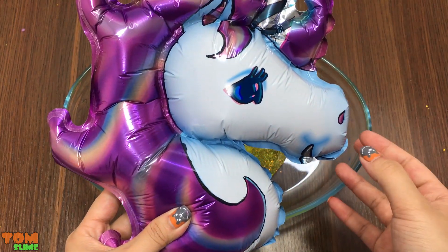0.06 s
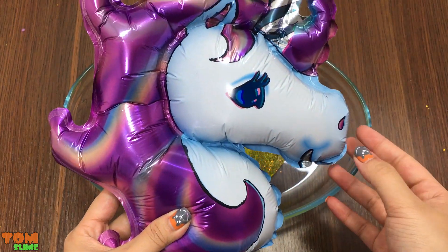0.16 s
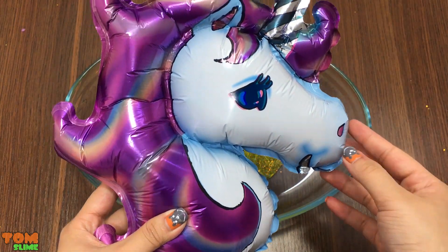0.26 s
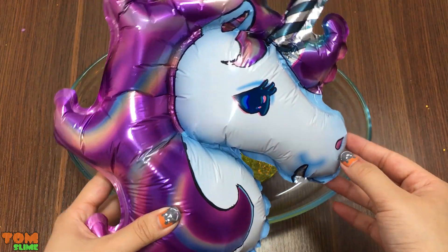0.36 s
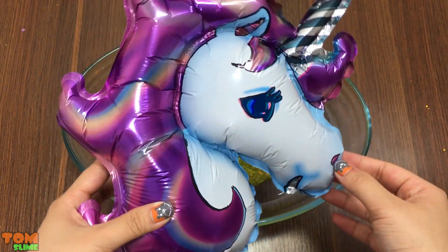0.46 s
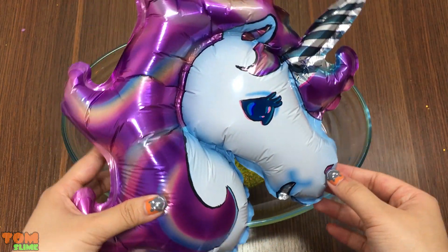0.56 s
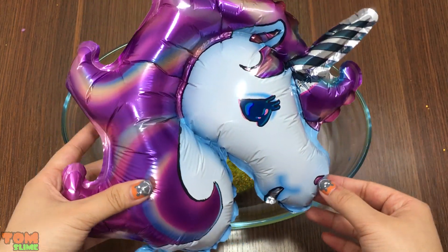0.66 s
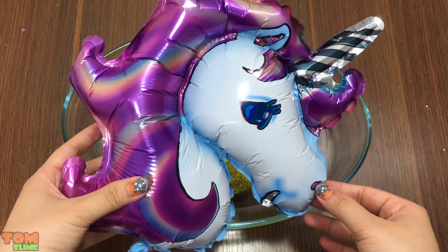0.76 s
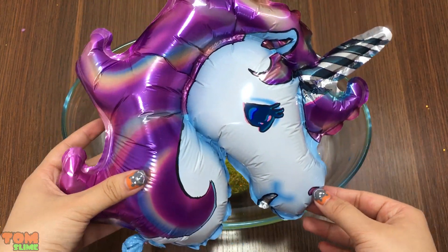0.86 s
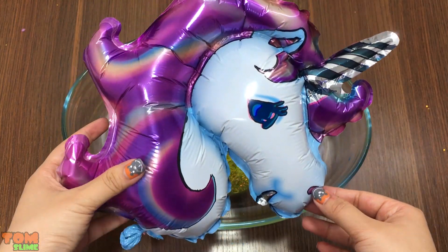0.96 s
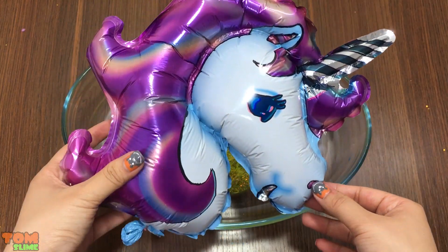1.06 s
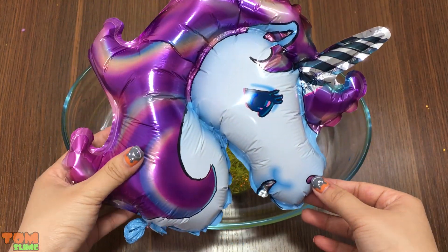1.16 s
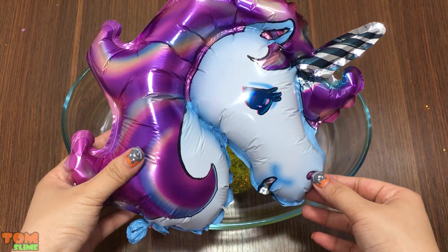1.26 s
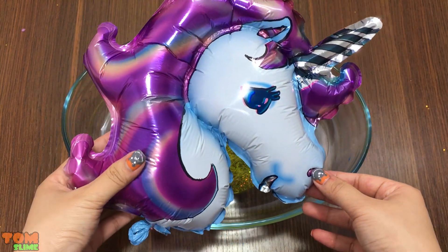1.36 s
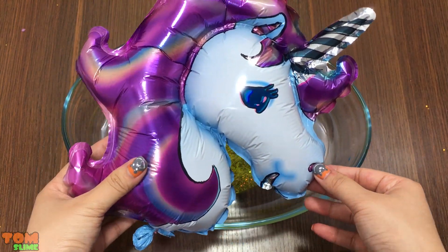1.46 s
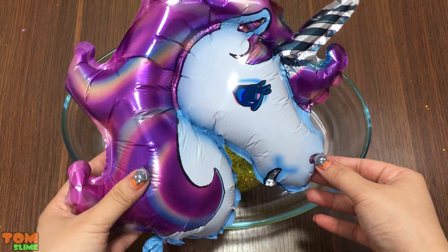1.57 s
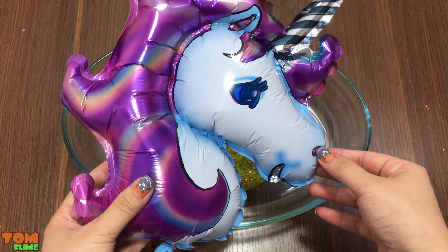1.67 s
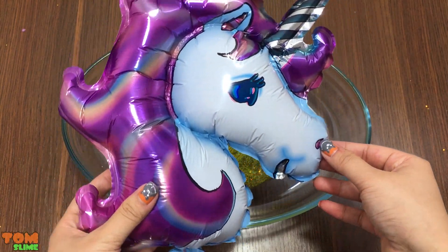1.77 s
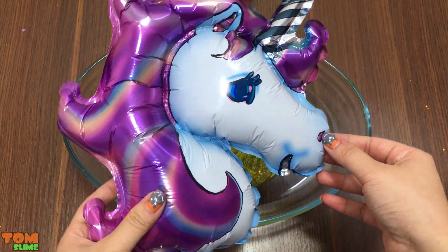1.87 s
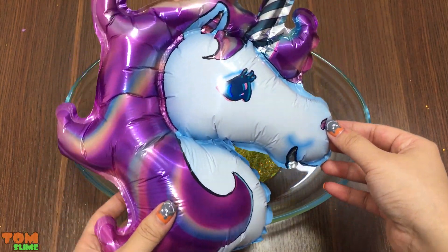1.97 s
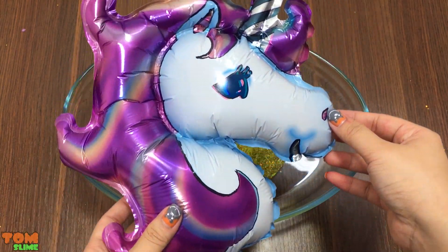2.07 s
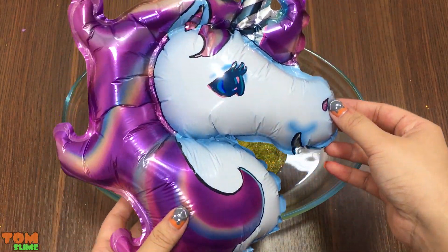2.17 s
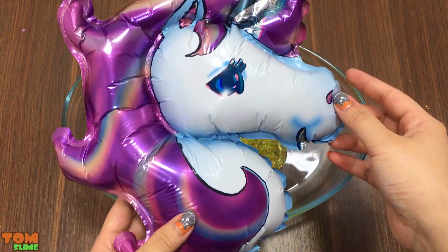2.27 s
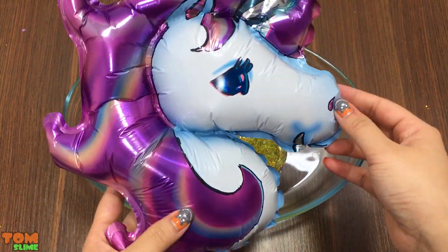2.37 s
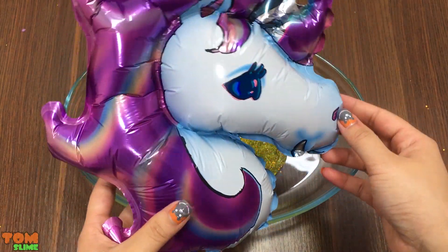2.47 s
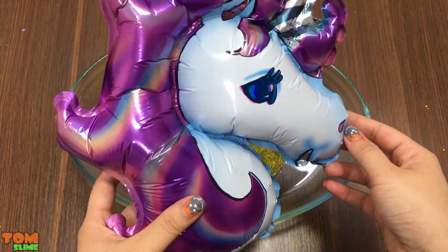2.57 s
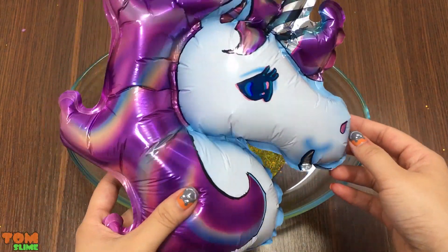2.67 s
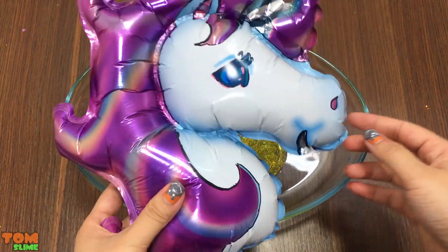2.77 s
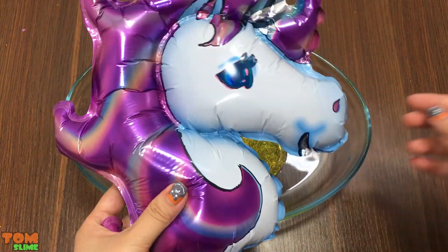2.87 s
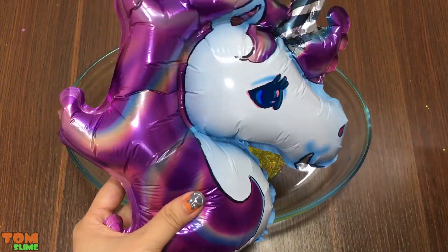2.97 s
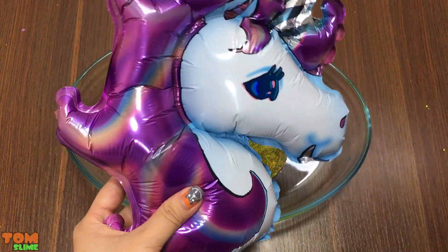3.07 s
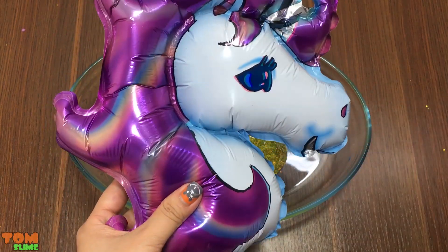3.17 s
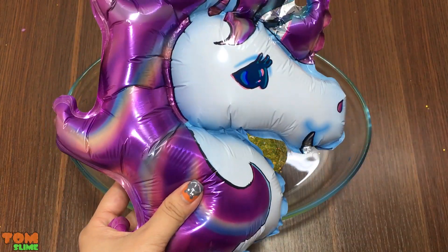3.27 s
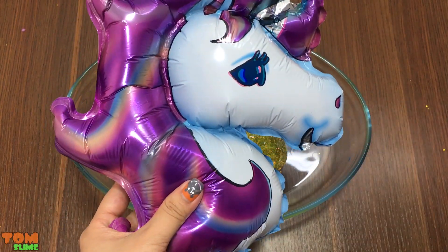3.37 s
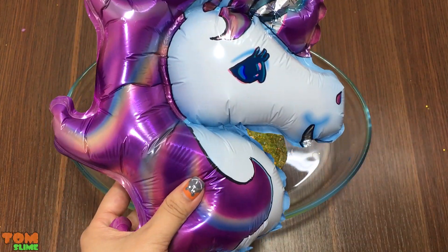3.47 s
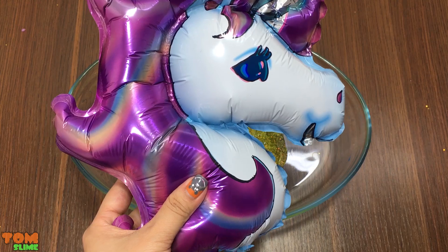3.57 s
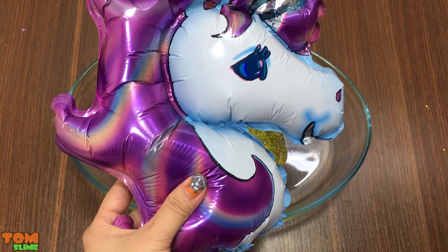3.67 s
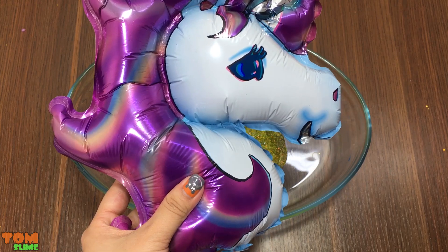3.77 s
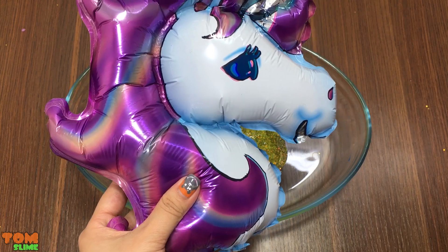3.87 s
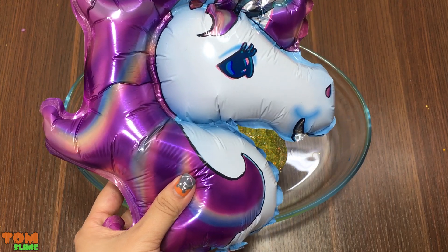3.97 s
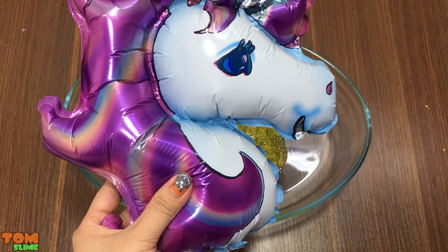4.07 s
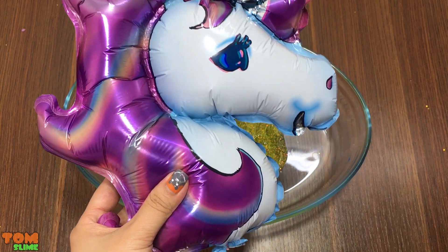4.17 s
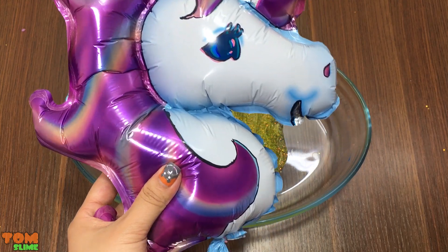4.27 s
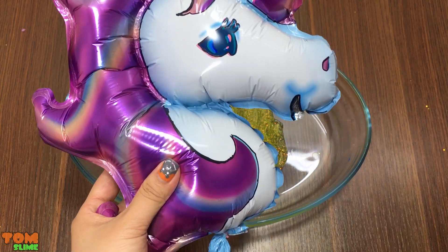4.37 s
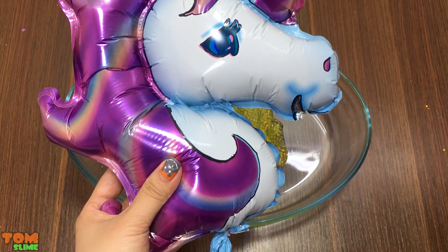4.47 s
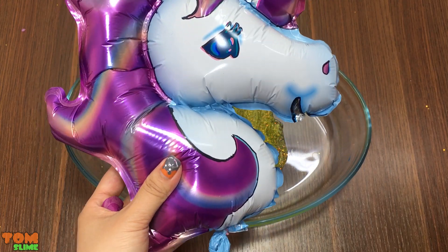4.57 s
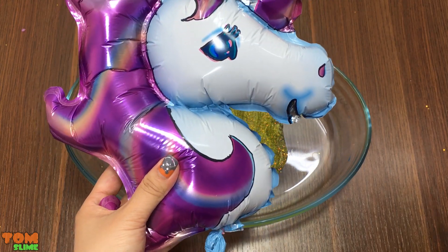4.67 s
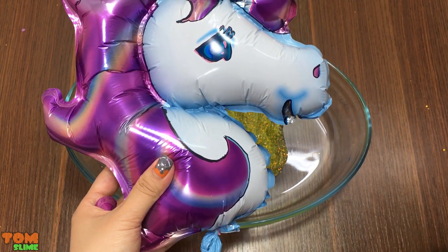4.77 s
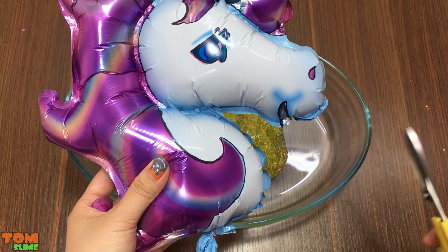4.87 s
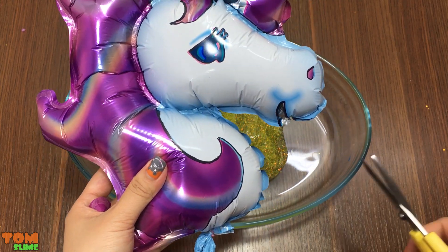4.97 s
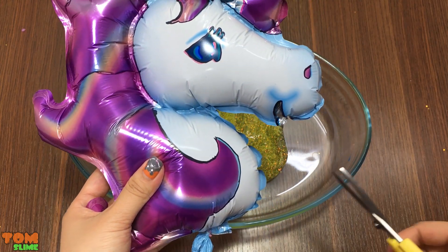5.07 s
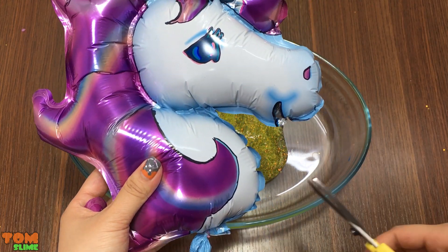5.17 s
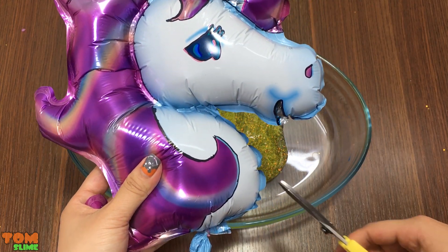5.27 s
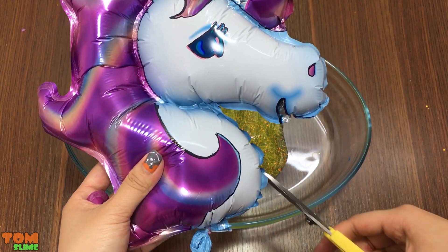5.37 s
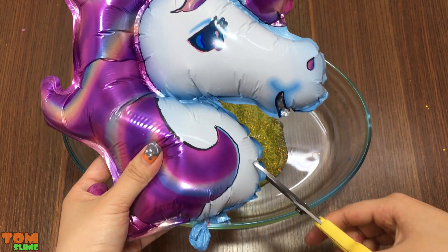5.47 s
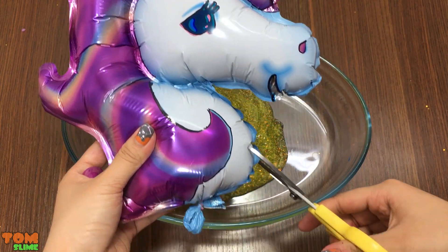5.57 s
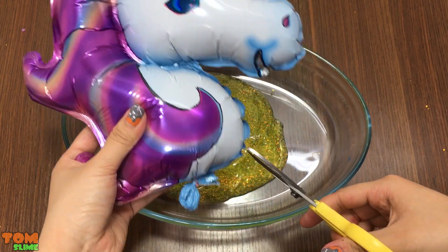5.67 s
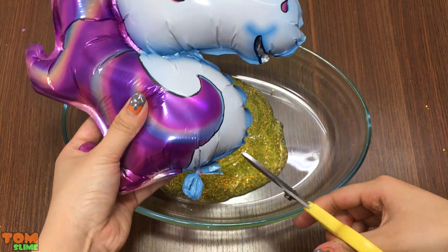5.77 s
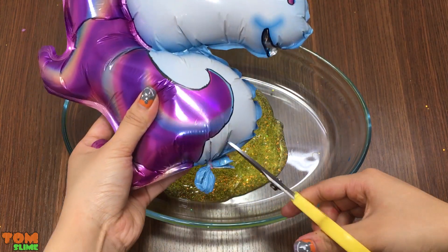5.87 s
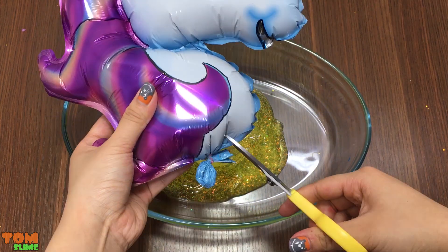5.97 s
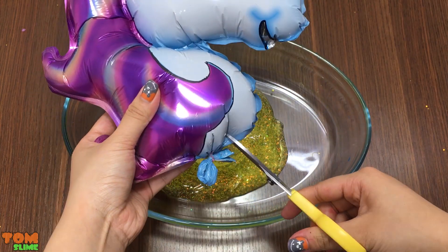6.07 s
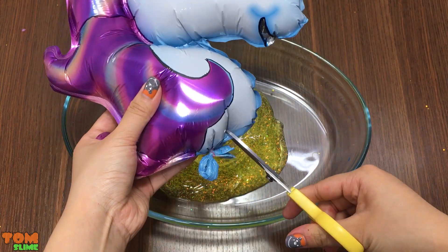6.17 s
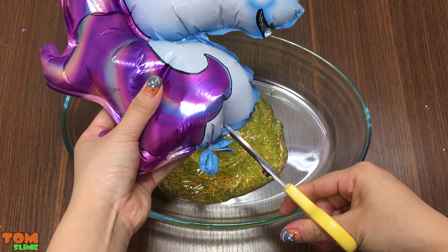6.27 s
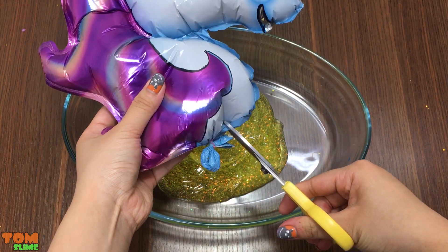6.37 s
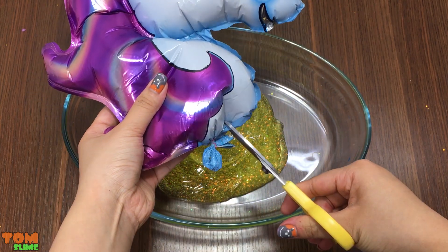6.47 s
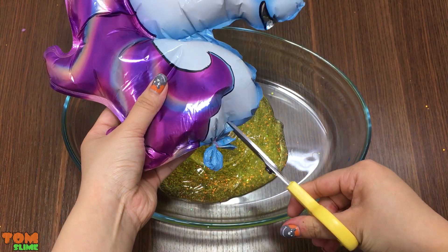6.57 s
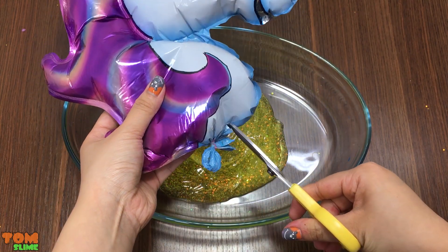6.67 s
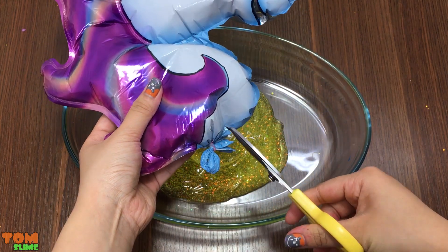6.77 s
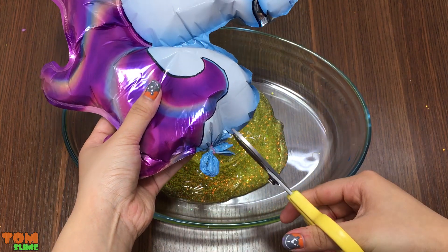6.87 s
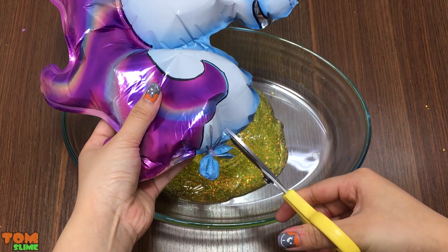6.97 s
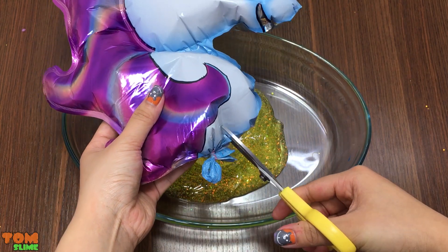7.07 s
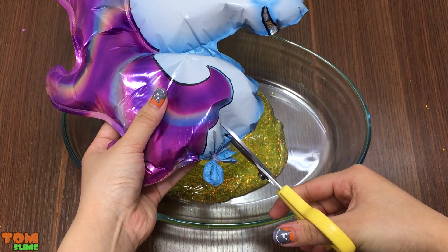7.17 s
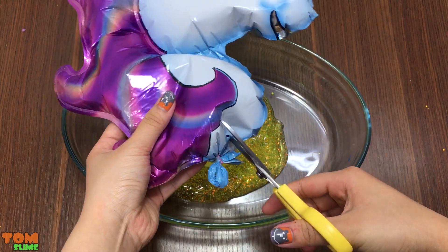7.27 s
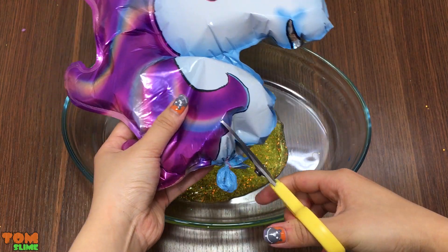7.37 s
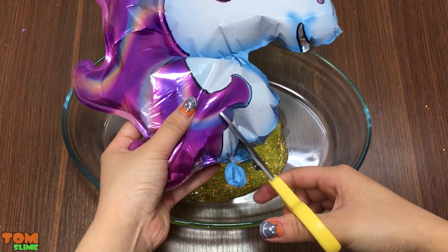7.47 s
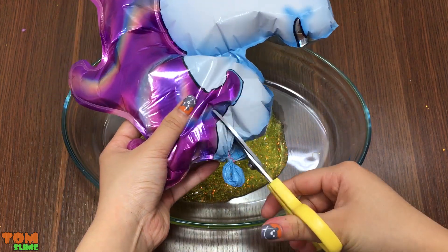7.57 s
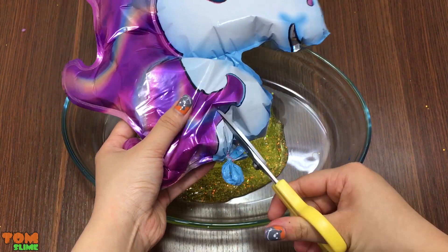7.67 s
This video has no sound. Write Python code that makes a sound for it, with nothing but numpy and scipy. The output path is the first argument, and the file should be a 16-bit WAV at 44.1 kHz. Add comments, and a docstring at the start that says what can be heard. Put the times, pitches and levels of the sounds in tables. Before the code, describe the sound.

Close to the microphone, fingers rub and bump a taut foil balloon, with sharp little creases snapping irregularly. A glass bowl pings faintly, scissors click lightly in a quieter spell, then the foil breaks with two very loud cracks close together and a third soon after. Dense crackling follows and swells to the end, in a hard room with a low appliance hum.

```python
"""Foil balloon burst with scissors

An inflated foil balloon is turned over a glass bowl, close to the microphone: creases snap, fingers bump and rub.
The bowl pings faintly, scissors click, and the foil gives way with three loud cracks, then crackles ever harder.
Snaps, knocks and rubbing are shaped noise with short facet rings; glass, steel and hum are sums of sines.
A hard room and the table top answer, over a faint appliance hum."""
import sys
import numpy as np
from scipy import signal
from scipy.fft import rfft, irfft, next_fast_len
from scipy.io import wavfile
from scipy.ndimage import map_coordinates

SR = 44100
rng = np.random.default_rng(int(sys.argv[2]) if len(sys.argv) > 2 else 0)


def master(y):
    """Save y as 16-bit WAV."""
    cut = np.clip(np.atleast_2d(y).T, -1, 1)
    pcm = np.round(cut * 32767)  # scale
    wavfile.write(sys.argv[1], SR, pcm.astype(np.int16))


N = 340893  # length in samples


def amp(db):
    """Turn decibels into gain."""
    return 10 ** (np.asarray(db) / 20)


def unit(x):
    """Scale to rms 1."""
    return x / np.sqrt(np.mean(x ** 2) + 1e-20)


def burst_of(x, seconds):
    """Scale a short sound to the energy of rms 1 held for that long."""
    return x * np.sqrt(seconds * SR / (np.sum(x ** 2) + 1e-20))


def along(points, hz):
    """Read a (Hz, value) curve on a logarithmic frequency axis."""
    f, v = np.transpose(points)
    return np.interp(np.log(hz + 1), np.log(f + 1), v)


def curves(rows):
    """Give one value per sample for each column after the time."""
    s, *columns = np.transpose(rows)
    return [np.interp(np.arange(N) / SR, s, column) for column in columns]


def wobble(rate):
    """Draw a smooth random curve with `rate` knots a second."""
    knots = rng.standard_normal(int(N * rate / SR) + 4)
    return map_coordinates(knots, [np.arange(N) * rate / SR])


def fade(t, t60):
    """Decay exponentially, 60 dB down after t60 seconds."""
    return np.exp(-np.log(1000) * t / t60)


def add(track, s, x):
    """Mix x into the track at time s."""
    start = max(round(s * SR), 0)
    track[start:start + len(x)] += x[:max(N - start, 0)]


def band(x, lo_hz, hi_hz):
    """Keep one band, without smearing it backwards in time."""
    return signal.lfilter(*signal.butter(2, [lo_hz, min(hi_hz, SR / 2 - 100)], "band", fs=SR), x)


def filtered(x, response):
    """Multiply the spectrum of x by a response given as a function of frequency."""
    size = next_fast_len(N + SR // 2)
    return irfft(rfft(x, size) * response(np.fft.rfftfreq(size, 1 / SR)), size)[:N]


def coloured(x, spectrum):
    """Colour x with a minimum-phase filter, so that ticks keep their sharp fronts."""
    size = 8192
    cepstrum = irfft(np.log(amp(along(spectrum, np.fft.rfftfreq(size, 1 / SR)))))
    # folding the cepstrum forward in time makes the filter minimum-phase
    cepstrum[1:size // 2] *= 2
    cepstrum[size // 2 + 1:] = 0
    return signal.fftconvolve(x, irfft(np.exp(rfft(cepstrum))))[:N]


# The appliance's steady tones. Each row: pitch in Hz, peak level in dB around which it wavers.
HUM = [(91.5, -61.5), (166.9, -69), (333.8, -63.5)]
# Colour of the air noise. Each row: frequency in Hz, relative level in dB per Hz.
AIR_COLOUR = [(20, -51), (30, -25), (39, -15), (50, 3), (63, 5.5), (78, -12.5), (110, -6.5), (170, -9.5),
              (340, -14.5), (520, -22.5), (1200, -29.5), (3000, -35.5), (7000, -37), (16000, -46.5)]
AIR_DB = -57.5  # rms


def background():
    """An appliance hums in wavering sine tones over the rumbling, noisy air of the room."""
    t = np.arange(N) / SR
    hum = 0
    for hz, db in HUM:
        level = amp(db + 0.73 * wobble(3.74))
        hum = hum + level * np.sin(2 * np.pi * hz * t + 0.26 * wobble(3.56))
    noise = filtered(rng.standard_normal(N), lambda hz: amp(along(AIR_COLOUR, hz)))
    return hum + amp(AIR_DB) * unit(noise)


# Fingers and blades dragging over the foil.
# Each row: start in seconds, length in seconds, rub level in dB, crinkle level in dB.
STROKES = [(0.305, .1, -63.5, -61.5), (0.415, 0.2, -58.5, -60), (0.617, 0.11, -62.5, -70),
           (0.694, .05, -62, -54), (0.934, 0.16, -61.5, -59), (1.167, 0.24, -69.5, -76),
           (1.536, 0.39, -64, -67.5), (1.806, 0.3, -61, -72), (2.242, 0.048, -62.5, -68.5),
           (2.32, 0.081, -59.5, -57.5), (2.416, .04, -61, -60.5), (2.475, 0.22, -62, -62),
           (2.684, 0.3, -59.5, -57), (2.902, 0.038, -67, -50), (3.119, 0.052, -76, -60.5),
           (3.419, .06, -53.5, -64), (3.75, 0.134, -62.5, -76), (3.919, 0.084, -59.5, -69),
           (4.567, 0.02, -73, -62.5), (5.638, 0.16, -62, -68), (6.015, .025, -54, -51),
           (6.11, 0.23, -59, -65), (6.625, 0.097, -57, -74), (6.935, 0.052, -44.5, -53),
           (7.099, 0.16, -52.5, -52.5)]
STROKE_ATTACK_S, STROKE_RELEASE_T60 = 0.0084, 0.043  # both in seconds
# The steady grip of the hand. One row: rub level in dB, crinkle level in dB.
GRIP_DB = (-81, -74.5)
# Crackling that starts at once and dies away after a crack; the first row is a sound already fading as the
# scene opens. # Each row: start in seconds, rub level in dB, crinkle level in dB, t60 in seconds.
DYING_CRACKLES = [(0.0, -41, -32.5, 0.58), (5.76, -55.5, -47.5, 0.36), (6.041, -41.5, -34.5, 0.42),
                  (6.276, -32.5, -24.5, 0.69), (6.735, -44, -49, 0.69)]
CRACKLE_ATTACK_S = 0.0027
# The emptying balloon crumples ever harder under the blades.
CRUMPLE_START_S, CRUMPLE_DB_PER_S = 7.3, 21.5
CRUMPLE_RUB_DB, CRUMPLE_CRINKLE_DB = -51.5, -50.5  # levels at the start


def effort():
    """Give the gains of rub and crinkle: grip, strokes, dying crackles and crumpling add in power."""
    t = np.arange(N) / SR

    def rise(s, attack):
        return np.clip((t - s) / attack, 0, 1)

    def fall(s, t60):
        return fade(np.maximum(t - s, 0), t60)

    moves = [(np.ones(N), *GRIP_DB)]
    for s, length, rub_db, crinkle_db in STROKES:
        shape = rise(s, STROKE_ATTACK_S) * fall(s + length, STROKE_RELEASE_T60)
        moves.append((shape, rub_db, crinkle_db))
    for s, rub_db, crinkle_db, t60 in DYING_CRACKLES:
        moves.append((rise(s, CRACKLE_ATTACK_S) * fall(s, t60), rub_db, crinkle_db))
    growth = amp(CRUMPLE_DB_PER_S * (t - CRUMPLE_START_S))
    crumple = rise(CRUMPLE_START_S, STROKE_ATTACK_S) * growth
    moves.append((crumple, CRUMPLE_RUB_DB, CRUMPLE_CRINKLE_DB))
    return np.sqrt(sum(np.outer(amp(levels_db), shape) ** 2 for shape, *levels_db in moves))


def friction(spectrum, grit, rate, spread_db):
    """Tiny slips of very unequal size stand over a smooth sliding hiss; rms 1."""
    sizes = amp(spread_db * np.clip(rng.standard_normal(N), -2, 2))
    ticks = (rng.random(N) < rate / SR) * sizes
    t = np.arange(SR // 200) / SR
    power = np.abs(signal.fftconvolve(ticks ** 2, fade(t, t60=0.005))[:N])
    slips = np.sqrt(grit * power / power.mean() + 1 - grit) * rng.standard_normal(N)
    return unit(coloured(slips, spectrum))


def facet(hz, cycles):
    """A patch of foil rings, 60 dB down after that many cycles; energy of rms 1 over 1 ms."""
    t = np.arange(SR // 25) / SR
    return burst_of(fade(t, cycles / hz) * np.sin(2 * np.pi * hz * t), .001)


# The larger wrinkles: how many a second, their middle pitch, their scatter in size.
WRINKLE_RATE, WRINKLE_HZ, WRINKLE_SPREAD_DB = 130, 1550, 3.5


def wrinkles(rate, centre_hz, spread_db):
    """Larger wrinkles buckle at random, each ringing at its own pitch; rms 1."""
    out = np.zeros(N)
    count = int(rate * N / SR)
    times = rng.random(count) * N / SR
    scatter = np.clip(rng.standard_normal((count, 2)), -2, 2)
    for s, (pitch, size) in zip(times, scatter):
        add(out, s, amp(spread_db * size) * facet(centre_hz * np.exp(.24 * pitch), cycles=15))
    return unit(out)


# How much of the friction comes as separate ticks, more once the blade is in.
# Each row: time in seconds, share from 0 to 1.
GRIT = [(0, .15), (.4, .35), (1.3, .55), (2.9, .35), (5.9, .4), (6.05, .8), (6.3, .7), (6.5, .88),
        (7.73, .92)]
# Colour of the low rubbing. Each row: frequency in Hz, relative level in dB per Hz.
RUB_COLOUR = [(100, -55), (200, 12), (400, 0), (700, 2.5), (1100, 7), (1550, -6), (2100, 4), (3000, -8),
              (5000, -42)]
# Colour of the fine crinkling. Each row: frequency in Hz, relative level in dB per Hz.
CRINKLE_COLOUR = [(1200, -29), (2500, 0), (3800, -2.5), (5400, -0.5), (7200, -1.5), (9500, 1), (11300, -3),
                  (13500, -1), (16000, -10)]
CLUMP_DB, CLUMP_RATE = 2.5, 63  # level swing at full grit, random knots a second


def handling():
    """Rubbing makes the stretched skin grumble and buckle while small wrinkles crackle above it."""
    rub_gain, crinkle_gain = effort()
    grit = np.clip(curves(GRIT)[0], 0, .98)
    grumble = friction(RUB_COLOUR, grit, rate=200, spread_db=7)
    buckling = wrinkles(WRINKLE_RATE, WRINKLE_HZ, WRINKLE_SPREAD_DB)
    share = .7 * grit  # buckling's share of the rub's power
    rub = rub_gain * (np.sqrt(1 - share) * grumble + np.sqrt(share) * buckling)
    crinkle = crinkle_gain * friction(CRINKLE_COLOUR, grit, rate=280, spread_db=2.0)
    # the foil sticks and lets go, so its noise comes in clumps
    clumps = amp(CLUMP_DB * grit * wobble(CLUMP_RATE))
    return clumps * (rub + crinkle)


def click(low_db, high_db, t60, flutter_db, flutter_t60):
    """A sharp crack, then a weaker flutter of the surface around it; energy of rms 1 over 1 ms."""
    t = np.arange(SR // 25) / SR
    shape = np.hypot(fade(t, t60), amp(flutter_db) * fade(t, flutter_t60))
    total = 0
    for lo, hi, db in [(900, 2500, low_db), (3100, 7000, 0), (7000, 15500, high_db)]:
        noise = unit(band(shape * rng.standard_normal(len(t)), lo, hi))
        total = total + amp(db) * np.sqrt(hi - lo) * noise  # wider bands carry more power
    return burst_of(total, .001)


# A duller snap comes from a larger facet, which rings lower.
FACET_HZ, FACET_DB_PER_OCTAVE = 6910, 6.5  # pitch at even colour, colour change per octave
FACET_LOW_HZ, FACET_HIGH_HZ = 1530, 9600  # largest and smallest facet


def facet_pitch(low_db, high_db):
    """The more a snap's treble stands over the bands beneath it, the higher its facet rings."""
    octaves = (high_db - 20 * np.log10(np.hypot(1, amp(low_db)))) / FACET_DB_PER_OCTAVE
    return np.clip(FACET_HZ * 2 ** octaves, FACET_LOW_HZ, FACET_HIGH_HZ)


# Creases flipping. Each row: start in seconds, level in dB over 1 ms (before mixing crack and ring),
# then the low and the high band in dB per Hz compared with the middle band.
SNAPS = [(0.002, -19, -7, 9), (0.0098, -17.5, 3, 4.5), (0.4434, -30.5, 2, 3), (0.4762, -34.5, 6, -5.5),
         (0.525, -29, 6.5, -3.5), (0.5287, -29.5, -5, -3), (0.6371, -24.5, 0.5, -5),
         (0.6708, -24.5, 1, -13.5), (0.7017, -38, 11, -10), (0.713, -31, 11, -1), (0.7266, -28.5, 0.5, -5),
         (0.7376, -35, 1, -6.5), (0.7428, -29.5, 3, -1.5), (0.9193, -26.5, 2, 6.5), (1.055, -34.5, 7, -9),
         (1.094, -33.5, 4.5, -2.5), (1.545, -53, 16, 1), (1.575, -46.5, 6.5, 4), (1.6026, -41, 13, -10),
         (1.6617, -36, 17, -15), (1.7383, -37.5, 12, -22), (1.8279, -24.5, -2.5, 3),
         (2.0817, -44, -10, -12.5), (2.3475, -33.5, 10, -15), (2.463, -43.5, 6, -14), (2.49, -41.5, 5, 2),
         (2.507, -36.5, -1.5, 1), (2.5179, -35, 3, -11), (2.5667, -38, 22, -15), (2.5864, -26.5, -17, -1),
         (2.724, -35.5, 6, -15), (2.7783, -24.5, -14, -2.5), (2.865, -32, 3.5, 2), (2.899, -33.5, 5, -1.5),
         (2.9694, -29, -3, -2.5), (3.212, -48.5, 20, -12), (3.2541, -23.5, -10.5, -3.5),
         (3.3651, -26.5, -22, -6.5), (3.404, -40, -2, -12), (3.42, -34.5, -21, -24),
         (3.975, -42.5, -3, -10.5), (4.051, -36.5, 13, -7), (5.592, -47, 5, -10), (5.682, -31.5, 1, 2.5),
         (5.7561, -30.5, -9, -5.5), (5.7762, -32, 1, -12), (5.78, -19, -3, -1), (6.0386, -28, 6, -6),
         (6.0444, -21.5, -2, -6.5), (6.054, -26, -4, 1), (6.0606, -25, 3.5, 6), (6.0686, -15.5, 0.5, -1),
         (6.155, -29.5, -20, -3), (6.1923, -29, -20, -2), (6.232, -15.5, -2, 2), (6.2349, -20, 0.5, -6.5),
         (6.26, -18.5, 6.5, -3.5), (6.3978, -27, 0, 1), (6.4266, -21, 6, 7), (6.448, -21.5, 0, 1),
         (6.476, -34, 3, 4), (6.533, -28.5, 3, 5.5), (6.5766, -33, -1, 8), (6.6313, -21, 8, -5.5),
         (6.649, -24, 12.5, 10), (6.6797, -29, -5, 7), (6.6939, -23.5, -1, -6.5), (6.7054, -28.5, 10, 2),
         (6.754, -22.5, 5, 4), (6.7914, -21.5, 13.5, 11), (6.897, -24.5, 4, 3), (6.9535, -21, 1, 3),
         (6.9621, -29, 0, 1), (7.0357, -32.5, -2, -8), (7.0583, -33, 7.5, -1), (7.0813, -34, -4, -13),
         (7.1145, -30.5, -7.5, -4.5), (7.1849, -33.5, -8, -3.5), (7.226, -31, 4, -1),
         (7.2444, -23.5, 0, -5), (7.2575, -25, 9, -3.5), (7.3232, -25.5, -3, 5), (7.3614, -34, -8, 1),
         (7.388, -29.5, 13, -1), (7.422, -31.5, 6, 0), (7.434, -29, 4, -7), (7.446, -26.5, 16, 2),
         (7.456, -24, 1.5, 6), (7.4723, -27.5, 11.5, 0), (7.5216, -32, 8, -7), (7.5498, -27, 13, -8),
         (7.5661, -24.5, 5, 3.5), (7.6291, -42, 5, 1), (7.6367, -23, -0.5, -2), (7.66, -27.5, 7, -7),
         (7.674, -14.5, -5, 0.5), (7.69, -20, 7, 5.5)]
# The blade breaking through. Each row: the same four columns as a snap,
# then the pitch of the facet in Hz and its ring in dB compared with the level.
CRACKS = [(6.2751, -2, -4, -2.5, 1866, -5), (6.3256, -5, 17.5, 5.5, 1900, -23),
          (6.7312, -13, 6, 6, 1580, -14), (6.7344, -5, 3.5, 10, 5920, -2)]
FACET_DB, FLUTTER_DB = -13, -10  # a snap's ring compared with its level, flutter with its crack
SNAP_T60, FLUTTER_T60 = 0.0068, 0.031  # seconds


def creases():
    """Each crease flips in milliseconds and rings the facet beside it; the blade's cracks do so far harder."""
    out = np.zeros(N)
    flips = []
    for s, db, low_db, high_db in SNAPS:
        flips.append((s, db, low_db, high_db, facet_pitch(low_db, high_db), FACET_DB))
    for s, db, low_db, high_db, hz, ring_db in flips + list(CRACKS):
        crack = click(low_db, high_db, SNAP_T60, FLUTTER_DB, FLUTTER_T60)
        add(out, s, amp(db) * (amp(-1.0) * crack + amp(ring_db) * facet(hz, cycles=28)))
    return out


# Blows on the taut skin. Each row: start in seconds, thud level in dB before a shared 2.5 dB cut,
# papery knock in dB above the thud before a shared 4 dB cut, thud pitch in Hz.
BUMPS = [(0.002, -29, 2, 227), (0.022, -36, -2, 150), (0.525, -45, 4, 323), (0.714, -42, -14, 410),
         (0.729, -39, 2, 417), (0.744, -54.5, 13, 470), (1.095, -51.5, -12, 453), (1.576, -47, 5, 210),
         (1.741, -53, 12.5, 400), (2.338, -53.5, 12, 188), (2.57, -45, -2, 227), (2.723, -47.5, 1, 243),
         (2.848, -42, 5.5, 149), (3.422, -58.5, 15.5, 395), (3.725, -48.5, 6, 396), (3.733, -43.5, -2, 264),
         (3.755, -47, -5, 280), (3.808, -52, -10, 270), (4.052, -39, 2.5, 415), (4.065, -45, 1, 404),
         (5.768, -46.5, 1, 756), (6.632, -55, 10, 450), (6.648, -55, 20, 450), (6.2764, -16.5, 4.5, 467),
         (6.279, -18.5, -5, 280), (6.3255, -21, 9, 380), (6.7327, -28.5, 8.5, 510), (7.186, -45, 3.5, 430),
         (7.198, -44.5, 8, 417), (7.235, -45, 10, 384), (7.456, -38.5, 5, 560), (7.496, -48, 4, 400),
         (7.568, -44.5, 12.5, 530), (7.63, -49, 7, 440), (7.695, -47, 11.5, 427)]
# The taut panel that answers every blow: pitch, and level compared with the knock.
PANEL_HZ, PANEL_DB = 1438, -5


def bumps():
    """Blows push the taut skin, a well damped drum pitched anew for each blow; the foil around it knocks."""
    out, t = np.zeros(N), np.arange(SR // 8) / SR
    panel = burst_of(fade(t, t60=0.037) * np.sin(2 * np.pi * PANEL_HZ * t), seconds=0.0055)
    for s, db, knock_db, hz in BUMPS:
        thud = band(rng.standard_normal(len(t)) * fade(t, t60=7 / hz), hz / 1.7, hz * 1.5)
        knock = band(rng.standard_normal(len(t)) * fade(t, t60=.036), lo_hz=700, hi_hz=1750)
        papery = burst_of(knock, .01) + amp(PANEL_DB) * panel
        add(out, s, amp(db - 2.5) * (burst_of(thud, .01) + amp(knock_db - 4) * papery))
    return out


def ring(modes, rise, width_hz):
    """Modes are struck at new strengths each time; loose contact makes their phase wander and widens them."""
    t = np.arange(SR // 2) / SR
    total = 0
    for hz, db, t60 in modes:
        strength = amp(db + 2 * rng.standard_normal())
        wander = np.cumsum(rng.standard_normal(len(t))) * np.sqrt(2 * np.pi * width_hz / SR)
        phase = wander + 2 * np.pi * rng.random()
        total = total + strength * fade(t, t60) * np.sin(2 * np.pi * hz * t + phase)
    return total * (1 - np.exp(-t / rise))


# Light touches on the glass bowl. Each row: start in seconds, ring level in dB, rise time in seconds.
BOWL_TAPS = [(2.0168, -40.5, .001), (2.110, -54, .003), (2.123, -46, .002)]
# Pitches of the bowl's modes, in Hz.
GLASS_HZ = [1351, 2165, 3105, 4215, 5445, 6862, 8396, 10090, 11930, 13905]
# Strength and life of those modes, in the same order. Each row: middle strength in dB, t60 in seconds.
GLASS_MODES = [(-11.5, .22), (-16.5, .55), (-22.5, .55), (1, .11), (3.5, .07), (-7, .125), (-7, .135),
               (-7, .085), (-5.5, .09), (-12.5, .1)]


def bowl():
    """The glass rim pings faintly: its modes ring along with a small contact click."""
    out = np.zeros(N)
    modes = [(hz, db, t60) for hz, (db, t60) in zip(GLASS_HZ, GLASS_MODES)]
    for s, db, rise in BOWL_TAPS:
        add(out, s, amp(db) * ring(modes, rise, width_hz=7))
        add(out, s, amp(db + 3.0) * click(0, -8, t60=0.0081, flutter_db=-13, flutter_t60=0.03))
    return out


def blade_slide(start, length, db):
    """Edge scrapes along edge as hissing noise that swells and dies away."""
    t = np.arange(int(length * SR)) / SR
    scrape = unit(band(rng.standard_normal(len(t)), lo_hz=2800, hi_hz=15500))
    out = np.zeros(N)
    add(out, start, amp(db) * scrape * np.sin(np.pi * t / length) ** 2)
    return out


# Steel contacts of the scissors. Each row: start in seconds, click level in dB over 1 ms,
# high band in dB per Hz compared with the middle band, ring gain in dB compared with the click level,
# ring centre in Hz.
SCISSORS = [(4.4437, -47, -15, -7, 2320), (4.6819, -38, 1, -14, 3950), (4.698, -45.5, -4, -16, 4000),
            (4.7602, -44.5, 2, -15, 4500), (4.7981, -38.5, 1, -6.5, 3380), (4.814, -42, -8, -10.5, 2800),
            (5.017, -55, -9, -24, 4000), (5.0507, -54, 7, -26, 5000), (5.067, -29.5, -7, -14.5, 6900),
            (5.2807, -38.5, -0.5, -20, 6000)]
# Modes of the blades. Each row: pitch in Hz, middle strength in dB at the ring centre, t60 in seconds.
STEEL_MODES = [(2090, -5, .33), (2190, -7, .2), (3880, -7, .08), (4350, -10, .06), (4950, -2, .15),
               (6280, -7, .05), (6920, -1, .07), (9900, -8, .05)]
# The blades sliding open. One row: start in seconds, length in seconds, level in dB before the swell.
SLIDE = (5.041, .036, -41)


def scissors():
    """The blades click against each other; where they meet decides which modes ring."""
    out = np.zeros(N)
    for s, db, high_db, ring_db, centre_hz in SCISSORS:
        # modes lose 7 dB for each octave away from the centre
        modes = [(hz, level - 7 * abs(np.log2(hz / centre_hz)), t60) for hz, level, t60 in STEEL_MODES]
        add(out, s, amp(db) * click(-14, high_db, t60=.005, flutter_db=-12, flutter_t60=.03))
        add(out, s, amp(db + ring_db) * ring(modes, rise=.0004, width_hz=20))
    return out + blade_slide(*SLIDE)


def table_echo(x, delay):
    """The table top returns the sound a few milliseconds later."""
    return np.pad(x, (round(delay * SR), 0))[:N]


# How long the room rings. Each row: frequency in Hz, t60 in seconds.
ROOM_T60 = [(150, 1), (400, 0.59), (1500, 0.8), (4000, 0.73), (8000, 0.58), (15000, 0.61)]
# Colour of the room's answer. Each row: frequency in Hz, gain in dB.
ROOM_COLOUR = [(100, -5), (400, 5), (1000, 1), (2000, 1), (5000, -0.5), (7000, -0.5), (15000, -5.5)]


def room(x):
    """Decaying noise makes a diffuse echo, with a fresh random pattern every third of a second."""
    out, size = np.zeros(N), SR // 3
    for start in range(0, N, size):
        hz, t, z = signal.stft(rng.standard_normal(SR * 3 // 4), SR, nperseg=256)
        decay = fade(t, along(ROOM_T60, hz)[:, None])
        tail = signal.istft(z * decay, SR, nperseg=256)[1]
        # the echo builds up over about a millisecond
        tail = tail * (1 - np.exp(-(np.arange(len(tail)) / SR / 0.00078) ** 2))
        add(out, start / SR, signal.fftconvolve(x[start:start + size], tail / np.linalg.norm(tail)))
    return coloured(out, ROOM_COLOUR)


# Colour of the path from the hands to the microphone. Each row: frequency in Hz, gain in dB.
PRESENCE = [(170, 2), (300, -0.5), (410, 3.5), (520, 0), (760, -3), (1100, -3.5), (1700, -1.5), (2800, -2),
            (3900, 1.5), (5200, -3.5), (6600, 0), (8200, -1), (11500, -3), (16000, -1)]


def scene():
    """Foil, glass and steel sound above the table, in the room."""
    near = coloured(handling() + creases() + bumps() + bowl() + scissors(), PRESENCE)
    echoes = amp(-19.5) * table_echo(near, delay=.003) + amp(-10.0) * room(near)
    return (near + echoes + background())[None]


TOP_HZ = 15850  # band limit


def record(dry):
    """The loudest cracks overload the recorder, which cuts steeply above its band limit."""
    clipped = dry[0] / (1 + np.abs(dry[0] / 1.05) ** 6) ** (1 / 6)
    return filtered(clipped, lambda hz: 1 / np.sqrt(1 + (hz / TOP_HZ) ** 160))[None]


dry = scene()
out = record(dry)
master(out)
```